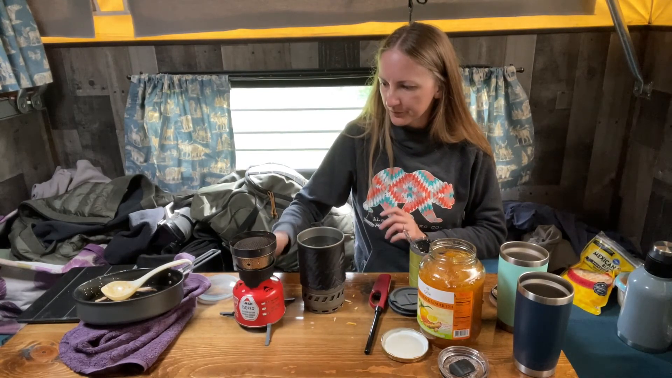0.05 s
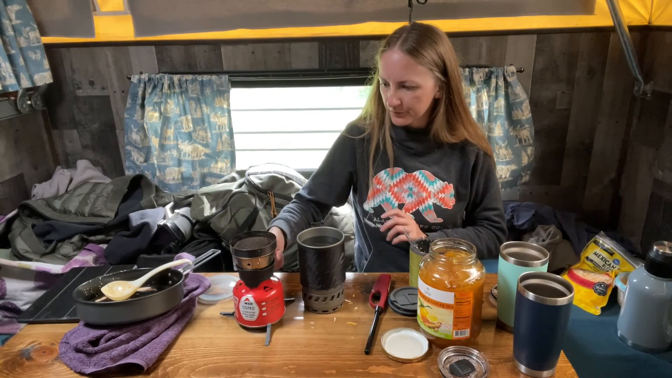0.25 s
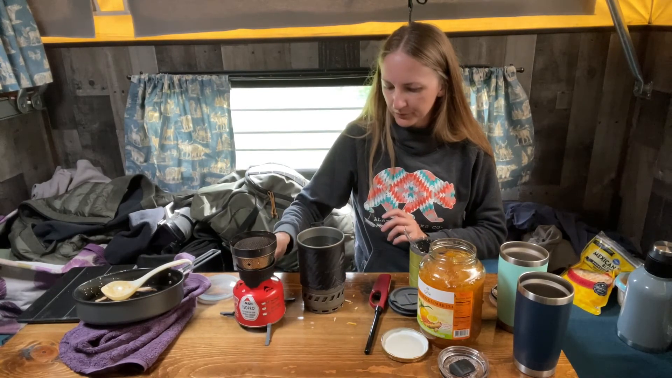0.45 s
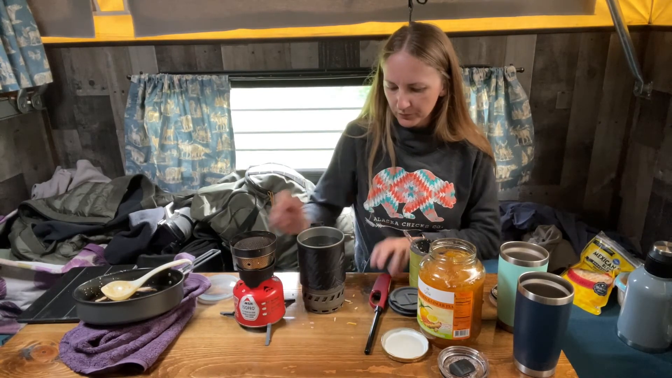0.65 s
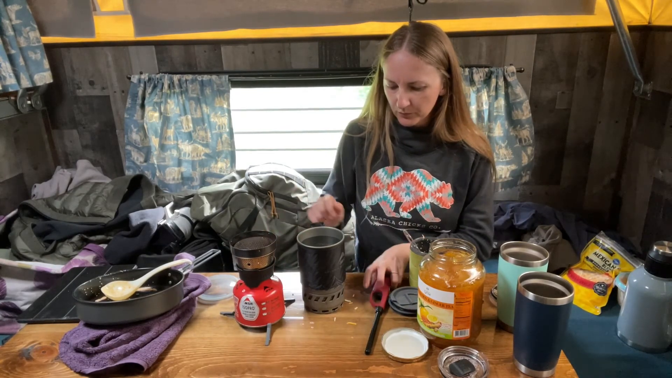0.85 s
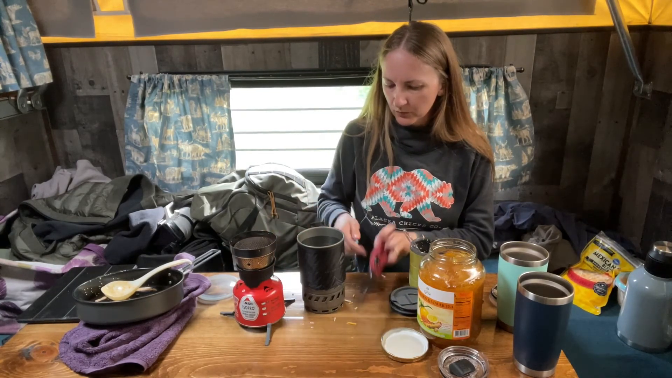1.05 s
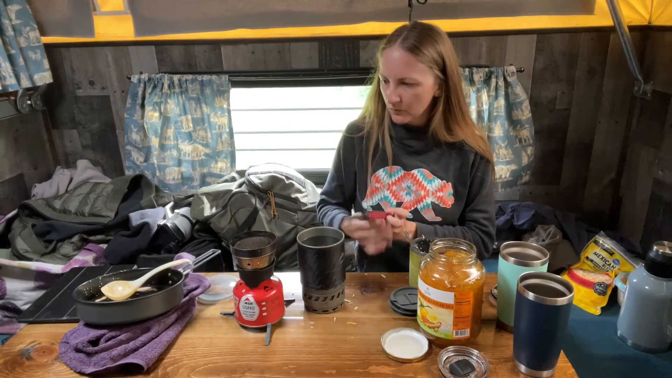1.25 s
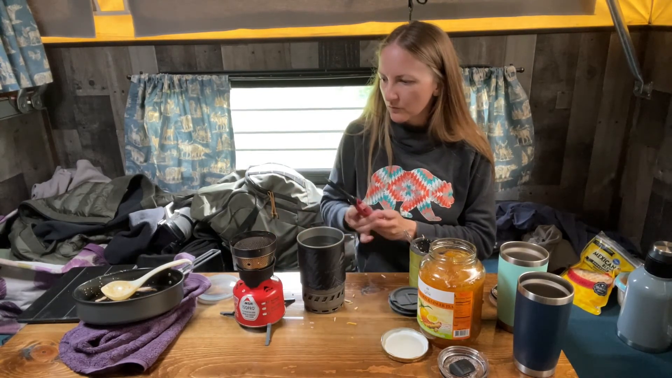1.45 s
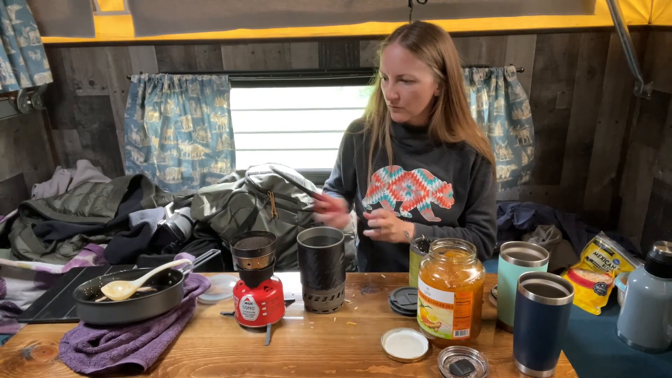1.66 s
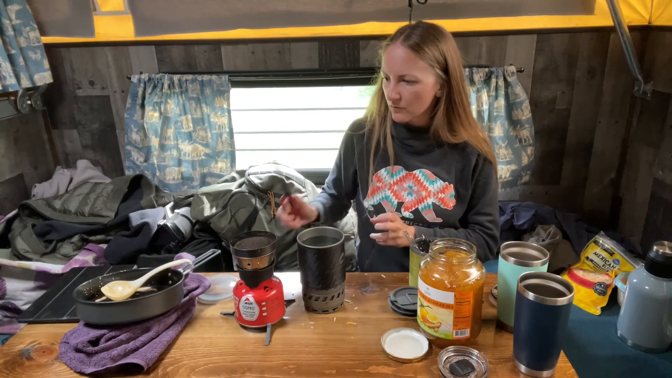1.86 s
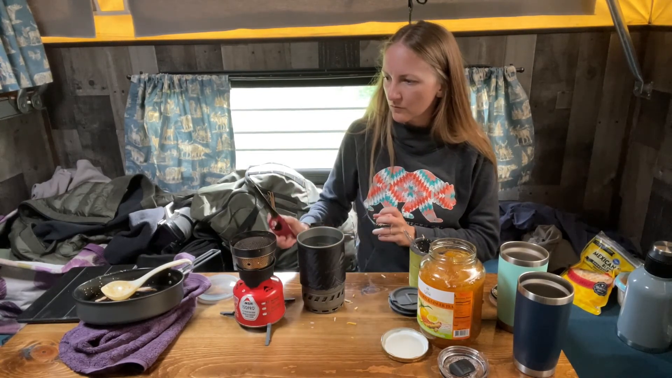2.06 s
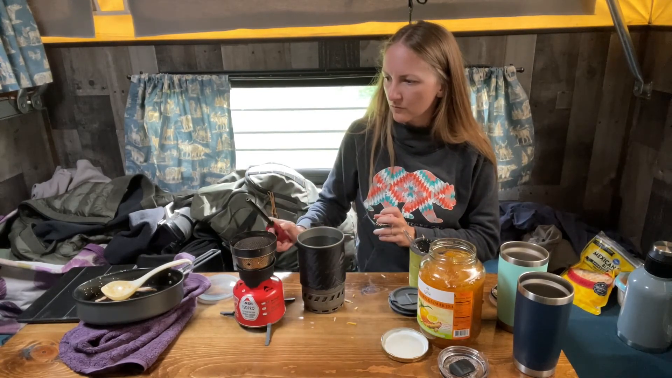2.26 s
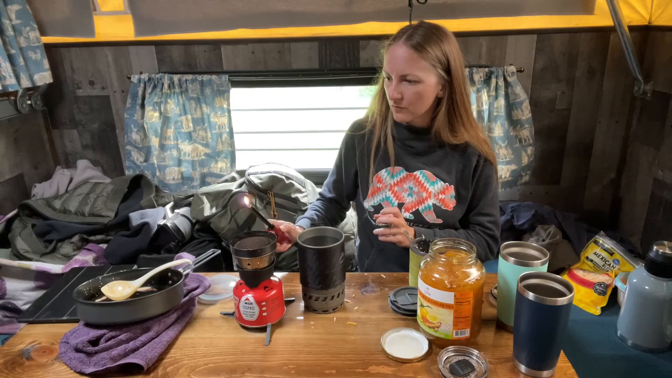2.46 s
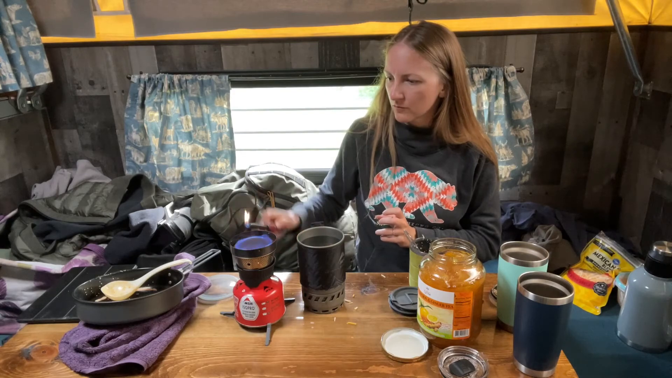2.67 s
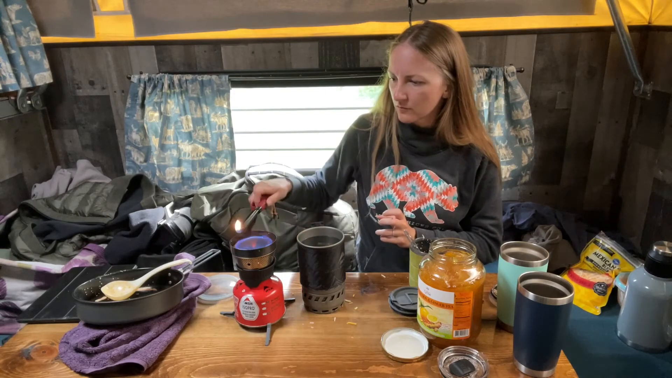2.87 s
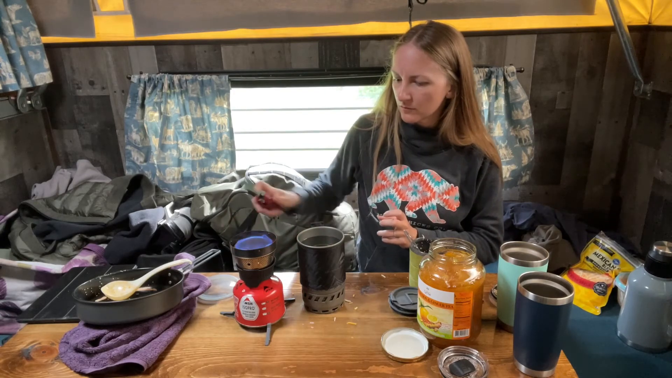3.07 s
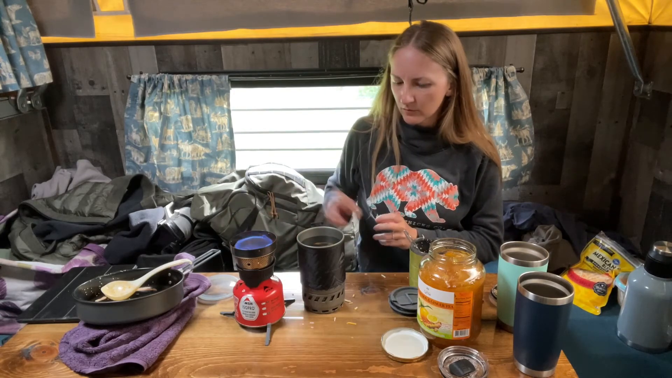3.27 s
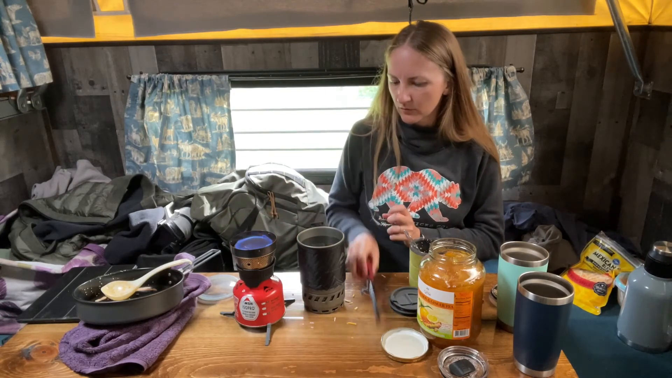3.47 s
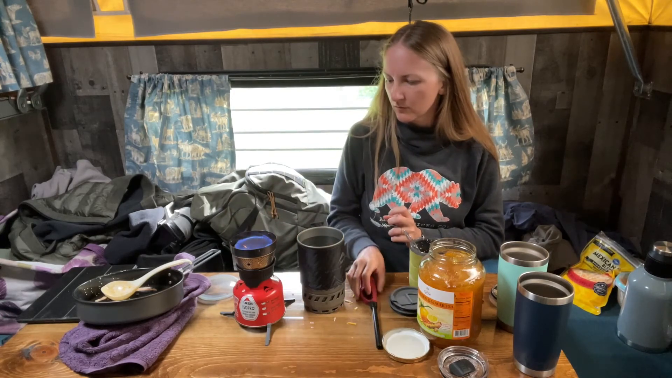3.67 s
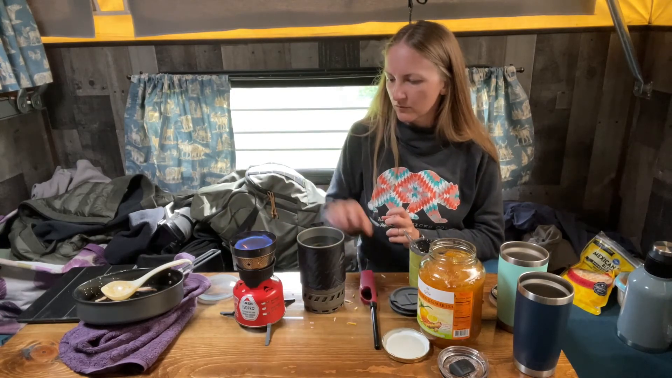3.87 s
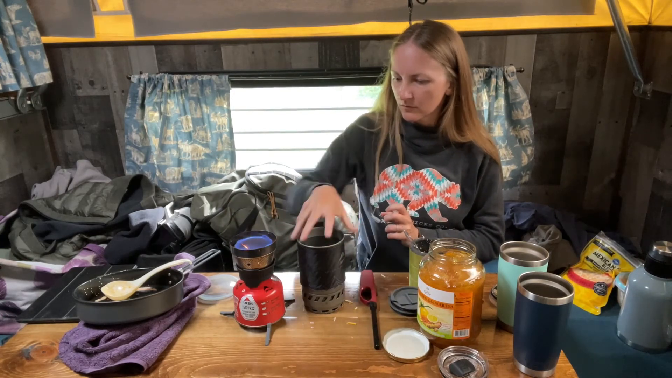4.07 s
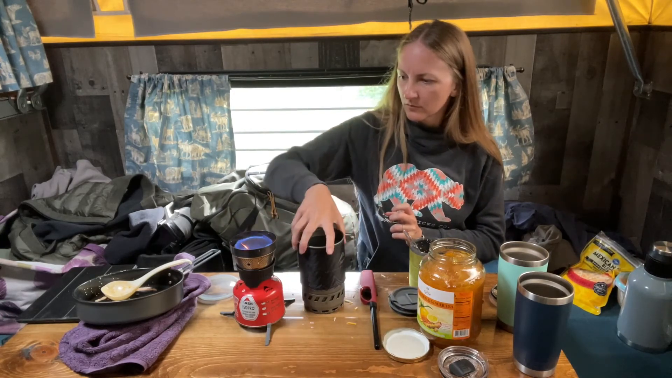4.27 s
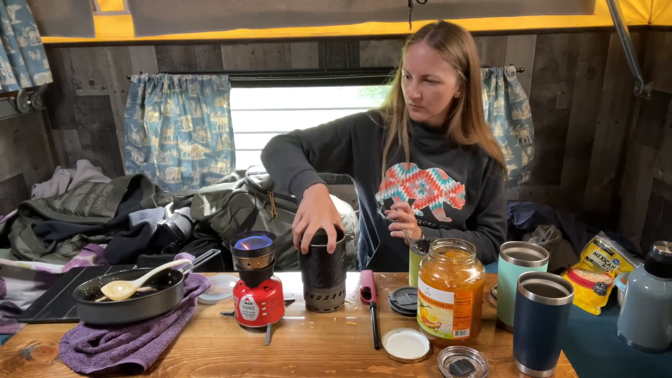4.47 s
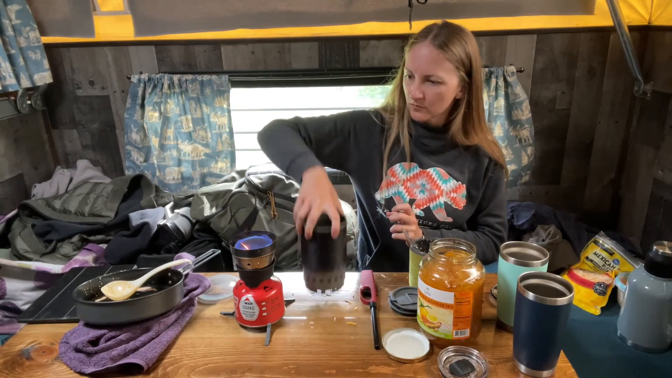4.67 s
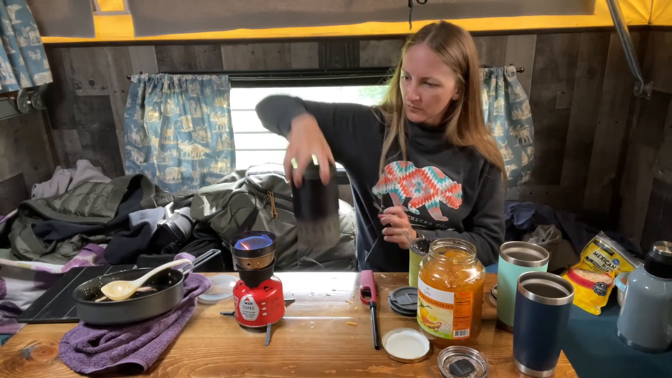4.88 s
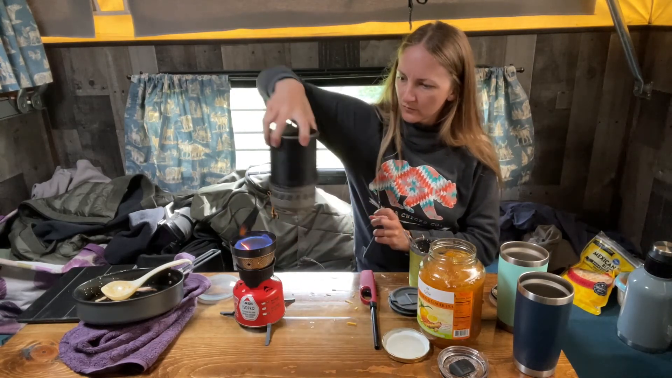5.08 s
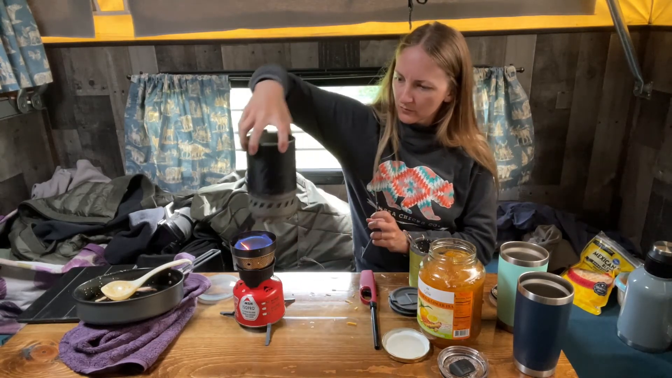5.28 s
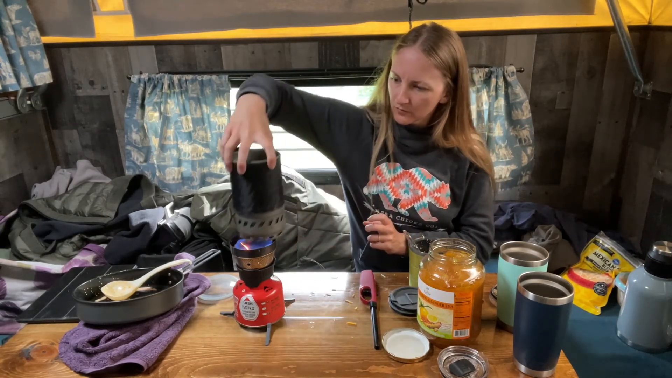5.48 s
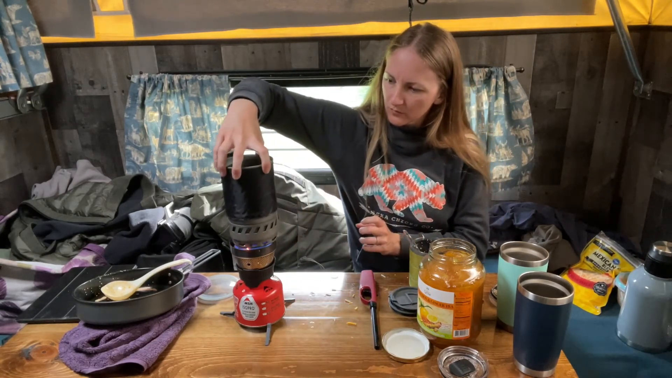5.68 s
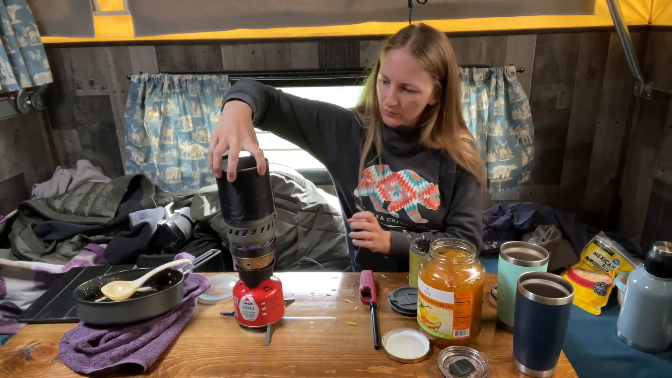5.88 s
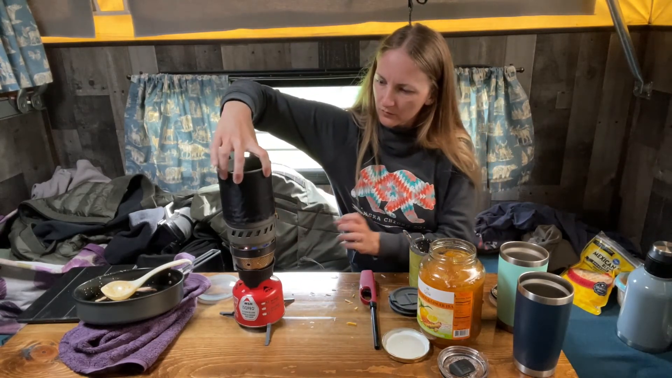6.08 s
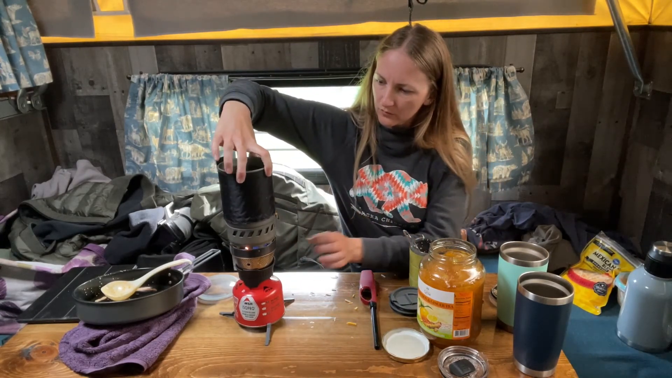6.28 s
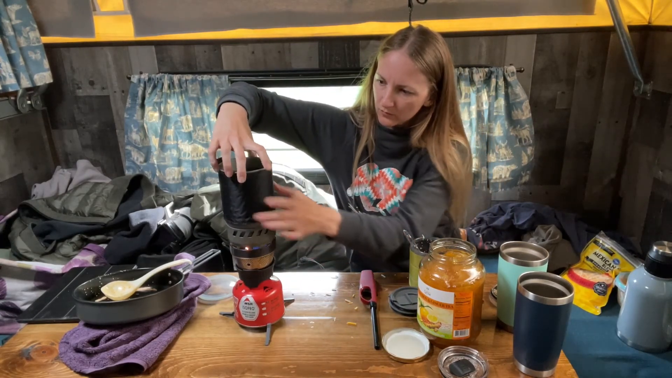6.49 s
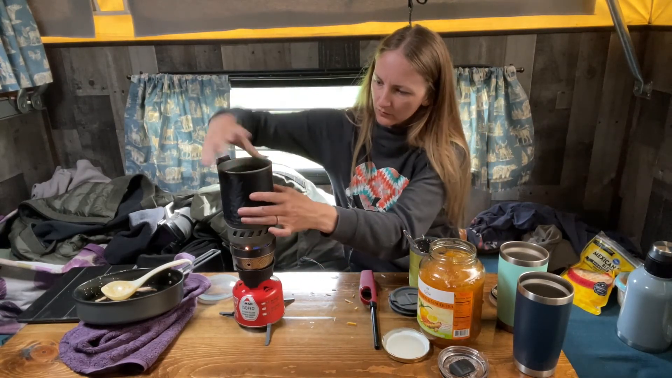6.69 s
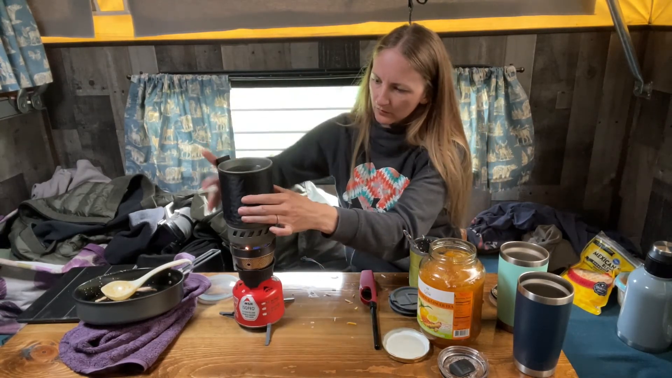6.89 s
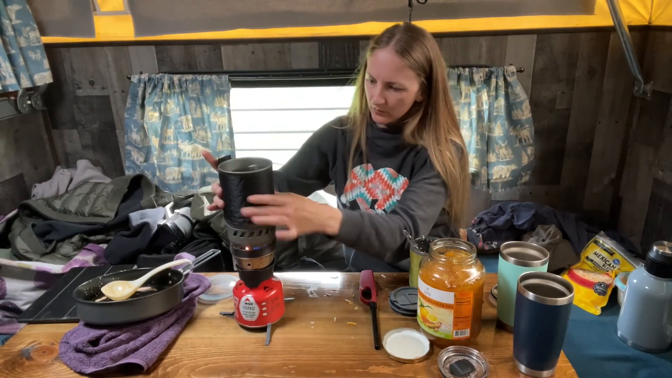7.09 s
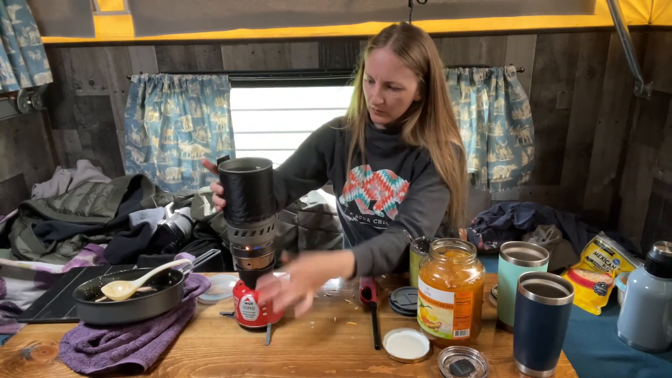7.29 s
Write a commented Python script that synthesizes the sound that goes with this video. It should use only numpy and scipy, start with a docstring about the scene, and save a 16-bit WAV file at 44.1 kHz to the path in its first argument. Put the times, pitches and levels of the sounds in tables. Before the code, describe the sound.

A faint gas hiss from a camp stove swells at about 0.2 seconds as the valve opens, then holds steady throughout, heard close in a small camper. Soft handling bumps come around 0.7 seconds. At 2.35 seconds a lighter snaps sharply, the loudest sound, and the gas catches with a low whump and puff. The hiss brightens a little over a faint flame rumble. The trigger clicks back at 2.8 seconds. At 3.4 seconds the lighter clatters onto a wooden table, its steel tube ringing briefly, with small bounces until 3.7. From 4 to 4.8 seconds a metal pot is gripped and lifted with light taps and faint swishes. It clanks twice onto the burner at about 5.5 seconds and scrapes into place with tiny ticks and dull bumps. The hiss shifts in tone and continues to the end, with one soft knock near 6.5 seconds.

```python
"""In a small camper, a canister camp stove stands on a wooden table. The valve opens and gas hisses from
the jet. A long piezo lighter snaps, the gas catches with a whump and the flame rumbles on. The lighter
drops on the table and its steel tube rings. Then a pot of water clanks onto the burner, changing the
colour of the hiss. Hiss, rumble and knocks are shaped noise; rings and thumps are fading pure tones."""
import sys
import numpy as np
from scipy import signal
from scipy.fft import rfft, irfft
from scipy.io import wavfile
from scipy.ndimage import uniform_filter1d, map_coordinates

SR = 44100
rng = np.random.default_rng(int(sys.argv[2]) if len(sys.argv) > 2 else 0)


def to_wav(sig):
    """Store sig (one row per channel, or 1-D mono) as 16-bit WAV at the path in sys.argv[1].

    Samples outside -1..1 are clipped; the rate is SR.
    """
    pcm = np.clip(np.atleast_2d(sig), -1, 1) * 32767
    pcm = np.round(pcm).astype(np.int16)
    wavfile.write(sys.argv[1], SR, pcm.T)  # frames by channels


N = 323694
TIME = np.arange(N) / SR

# Overall shape of each noise, from bass to treble: pitch_hz, level_db
COLD_HISS_SHAPE = [(150, -18.5), (550, -13), (1100, -14.5), (1700, -9.5), (2700, -9.5), (3500, -11),
                   (4400, -15.5), (5400, 1.5), (6700, -5.5), (9500, -6), (11500, -15.5), (13300, -14),
                   (14400, -10.5), (15500, -17)]
LIT_HISS_SHAPE = [(150, -9.5), (550, -8), (1100, -13), (1700, -7.5), (2700, -2), (3500, -5.5), (4400, -3.5),
                  (5400, 1.5), (6700, -2.0), (9500, -1.2), (11500, -11.5), (13300, -8), (14400, -6),
                  (15500, -9)]
COVERED_HISS_SHAPE = [(150, -2.5), (550, -11), (1100, -13), (1700, -4), (2700, -1), (3500, -12),
                      (4400, -5.5), (5400, -1.5), (6700, -15.0), (9500, -1), (11500, -14.5), (13300, -14.5),
                      (14400, -6), (15500, -23)]
FLAME_SHAPE = [(20, -17), (33, -14), (48, 3), (65, -0.5), (80, -5), (105, -4), (140, -27.5), (300, -23),
               (1000, -75)]
PUFF_SHAPE = [(60, 3), (270, 5), (500, -20), (1300, -21), (4000, -38)]
SNAP_SHAPE = [(150, -17.5), (700, -23), (1100, -15), (2800, 1.5), (4300, -6.5), (6500, -3), (10500, -3.5),
              (12000, -17), (14000, 1), (15700, -7)]
WOOD_SHAPE = [(100, -30), (250, -11.5), (450, -1.5), (620, -10.5), (1100, -3), (2300, -2.5), (3200, -4.5),
              (6000, -14), (10000, -17), (15500, -27)]
POT_SHAPE = [(150, -9), (500, -12.5), (1100, 3.5), (3000, -6), (5000, -6), (9000, -2), (12000, -18),
             (15500, -20)]
CAMPER_SHAPE = [(20, -10), (45, -2.5), (95, 3), (160, -6), (260, -7.5), (400, -11), (600, -12.5),
                (1500, -15), (6000, -44)]

# Resonances, the pitches that each object makes louder: pitch_hz, width_hz, boost_db
COLD_BURNER_PEAKS = [(642, 28, 8.2), (770, 74, 10.7), (934, 32, 14.8), (1280, 103, 15), (1500, 44, 13.5),
                     (1708, 150, 11.4), (1865, 64, 8.6), (2083, 63, 10.4), (2356, 113, 10),
                     (2830, 380, 5.8), (3620, 59, 4.8), (3960, 59, 9), (4180, 140, 13.8), (4510, 210, 13.3),
                     (5018, 115, 13.5), (5254, 62, 6.8), (5610, 61, 9.5), (5820, 61, 7.3), (6050, 38, 8.4),
                     (8280, 51, 6.8)]
LIT_BURNER_PEAKS = [(771, 106, 12.4), (935, 25, 16.3), (1232, 220, 12.7), (1303, 36, 11.2),
                    (1462, 91, 11.2), (1695, 107, 13.3), (1895, 102, 12.7), (2028, 46, 9.1),
                    (2400, 107, 11.1), (2644, 48, 7.5), (3950, 87, 6.8), (4197, 74, 10.5), (4640, 63, 13.6),
                    (4890, 96, 9.1), (5226, 210, 9.7), (5510, 100, 13.1), (5800, 110, 12), (6030, 52, 11),
                    (6330, 130, 6.3), (6870, 42, 7.6)]
COVERED_BURNER_PEAKS = [(770, 88, 9.9), (933, 64, 15.4), (1260, 36, 11), (1453, 100, 10.4),
                        (1576, 250, 12.9), (1930, 37, 5.3), (2415, 15, 15), (4190, 68, 6.2),
                        (4660, 67, 6.7), (4982, 227, 15.6), (5610, 61, 11.3), (5833, 215, 12.4),
                        (6016, 250, 8.3), (6410, 230, 11), (6700, 169, 9.7), (7070, 120, 16),
                        (7350, 52, 6.4), (7650, 64, 7.3), (7920, 200, 9.9), (8270, 190, 6.1)]
LIGHTER_PEAKS = [(1000, 180, 4.5), (1380, 470, 13.2), (2280, 220, 13), (3590, 110, 4), (5030, 490, 9.1),
                 (8600, 720, 11.3), (9630, 246, 7)]
TABLE_PEAKS = [(491, 44, 8.5), (820, 170, 10.7), (1590, 290, 10), (2030, 43, 4.2)]
POT_BODY_PEAKS = [(1620, 50, 10.2), (2140, 115, 8.9), (2430, 310, 9.5), (3110, 790, 10.2), (3860, 520, 7.8),
                  (4800, 300, 13), (5570, 530, 2.5), (12879, 139, 8.3)]

# Short bursts (more tilt is brighter): start_s, level_db, tilt_db_per_octave, boosted_pitch_hz
FLAME_PUFFS = [(2.497, -30.5, 1.5, 776), (2.523, -29, -10, 231)]  # the flame runs round the burner
TRIGGER_SNAPS = [(2.3513, -4, -0.5, 1460), (2.3558, -10, -0.5, 2700), (2.807, -23.5, -2.5, 2700)]  # the trigger is pressed and let go
LIGHTER_KNOCKS = [(.697, -43, -6, 300), (0.786, -36, 6, 1500), (1.607, -40.5, -2, 2600),
                  (3.431, -14, 5.5, 2200), (3.4396, -12.5, -0.5, 1690), (3.581, -34, 3.5, 1600),
                  (3.595, -18.5, -0.5, 1470), (3.655, -24.5, 3, 3300), (3.662, -28.5, -7.5, 950)]  # the lighter is picked up, handled and dropped
POT_CLANKS = [(4.016, -28.5, 6, 3300), (4.058, -31.5, 3.5, 8300), (4.1, -41, -5, 2200),
              (4.16, -38.5, -4, 1700), (4.615, -39.5, -3, 2500), (4.78, -39, -4, 1100),
              (5.4969, -19, 1, 1470), (5.5897, -21.5, -1.5, 2360), (5.604, -35, 4, 4100),
              (6.464, -33.5, -2.5, 450)]  # the pot is gripped, lifted and set on the burner

# Swells of pressure as the gas catches: start_s, pitch_hz, level_db, rise_s
WHUMPS = [(2.452, 42, -33.5, 0.024), (2.497, 75, -28.5, 0.0076), (2.531, 46.7, -22.5, 0.014)]
# The lighter's tube rings while it is clear of the wood: start_s, end_s, level_db, fade_s
# (here and below, a fade is the time a sound takes to drop by 60 dB)
LIGHTER_RINGS = [(3.432, 3.497, -18.5, 0.48), (3.509, 3.598, -34, 0.61)]
# Ringing tones of the pot's metal base, relative to the clank: pitch_hz, level_db
POT_TONES = [(1420, -13.5), (2090, -15), (2430, -8.5), (3020, -14), (3970, -12), (4830, -11)]
# Swishes as things are handled: middle_s, level_db, half_length_s
HAND_SWISHES = [(0.715, -49, 0.027), (4.122, -53, 0.07), (4.341, -52, 0.037), (4.789, -48, 0.025),
                (5.163, -53, .07), (5.769, -52.5, .11), (6.302, -51, 0.042), (6.808, -58, .04)]
# Hands bump the table: start_s, level_db
HAND_BUMPS = [(.712, -36), (.82, -44), (4.335, -40), (5.671, -38.5), (5.924, -38.5)]

CATCH_S, WARM_UP_S = 2.45, 0.12  # the burner warms once the gas has caught
HALF_COVERED_S, COVER_EASE_S, COVER_DB = 5.48, 0.15, -1.0  # the pot comes down over the burner


def gas_jet():
    """Swirling gas hisses through the burner; heat and then the pot shift its resonances."""
    heat = ramp(CATCH_S, WARM_UP_S)
    covered = .5 + .5 * np.tanh(.5 * (TIME - HALF_COVERED_S) / COVER_EASE_S)
    valve_open = ramp(start_s=.16, length_s=.15)
    trickle_db, full_flow_db = -46.5, -37.5
    flow_db = trickle_db + (full_flow_db - trickle_db) * valve_open + COVER_DB * covered
    cold_hiss = np.sqrt(1 - heat) * noise(COLD_HISS_SHAPE, COLD_BURNER_PEAKS)
    lit_hiss = np.sqrt(heat) * noise(LIT_HISS_SHAPE, LIT_BURNER_PEAKS)
    covered_hiss = np.sqrt(covered) * noise(COVERED_HISS_SHAPE, COVERED_BURNER_PEAKS)
    hiss = np.sqrt(1 - covered) * (cold_hiss + lit_hiss) + covered_hiss
    heard = with_echoes(hiss, echo_db=-15, spread_s=.014, above_hz=3700, sway_s=.00004)
    return from_db(flow_db) * steady(heard, over_s=0.2)  # the valve holds the flow steady


def flame():
    """The gas catches with a whump and a soft puff, flares, then settles to a steady rumble."""
    light_s, settle_s, settled_db = 2.34, 0.19, -50
    flare_db = 4 * np.exp(-np.maximum(TIME - light_s, 0) / settle_s)
    strength = ramp(light_s, length_s=.04) * from_db(settled_db + flare_db)
    rumble = strength * steady(noise(FLAME_SHAPE), over_s=.2)
    puff = knocks(FLAME_PUFFS, PUFF_SHAPE, [],
                  attack_s=0.0016, fade_s=0.081, boost_db=15.5, tail_db=-22, tail_fade_s=.2)
    return rumble + puff + thumps(WHUMPS)


def lighter():
    """The piezo trigger snaps; later the lighter clatters on the wood and its steel tube rings."""
    out = knocks(TRIGGER_SNAPS, SNAP_SHAPE, LIGHTER_PEAKS,
                 attack_s=0.00056, fade_s=0.046, boost_db=5, tail_db=-12.5, tail_fade_s=0.14)
    out += knocks(LIGHTER_KNOCKS, WOOD_SHAPE, TABLE_PEAKS,
                  attack_s=0.001, fade_s=0.097, boost_db=5, tail_db=-18.5, tail_fade_s=0.32)
    t, touch_s, tube_hz = TIME[:SR], .005, 3796
    for start_s, end_s, level_db, fade_s in LIGHTER_RINGS:
        off_wood = np.clip(t / touch_s, 0, 1) * np.clip((end_s - start_s - t) / touch_s + .5, 0, 1)
        ring = from_db(level_db - 60 * t / fade_s) * np.sin(2 * np.pi * tube_hz * t)
        add(out, start_s, off_wood * ring)
    return out


def pot():
    """The pot clanks, scrapes and rings; its sleeve and the water quickly hush it."""
    out = knocks(POT_CLANKS + rim_slips(), POT_SHAPE, POT_BODY_PEAKS,
                 attack_s=0.001, fade_s=0.089, boost_db=9, tail_db=-27, tail_fade_s=0.15)
    t, fade_s = TIME[:SR // 2], 0.1
    ring = sum(from_db(db - 60 * t / fade_s) * np.sin(2 * np.pi * hz * t) for hz, db in POT_TONES)
    for start_s, level_db, *_ in POT_CLANKS:
        add(out, start_s, from_db(level_db) * ring)
    return out


def rim_slips(start_s=5.66, length_s=.21, count=10, level_db=-41.5, tilt_db=-3, pitch_hz=3680):
    """List the tiny, uneven knocks of the rim catching as the pot is twisted into place."""
    step_s = length_s / (count - 1)
    return [(start_s + step_s * (k + .5 * late), level_db + extra_db, tilt_db, pitch_hz)
            for k, (late, extra_db) in enumerate(rng.standard_normal((count, 2)))]


def table_top(pitch_hz=95.2, rise_s=0.012, delay_s=0.0129):
    """The table sways with one low note under lighter, pot and hands; dull knocks sway it more."""
    sways = [(start_s + delay_s, level_db - 18 - 1.9 * tilt_db)
             for start_s, level_db, tilt_db, _ in LIGHTER_KNOCKS + POT_CLANKS]
    return thumps([(start_s, pitch_hz, level_db, rise_s) for start_s, level_db in sways + HAND_BUMPS])


def hands(pitch_hz=344):
    """Hands make soft, hollow swishes as they move things."""
    out = np.zeros(N)
    for middle_s, level_db, half_length_s in HAND_SWISHES:
        hollow = noise([(60, -6), (300, 2), (900, -4), (4000, -35)], [(pitch_hz, 110, 14)], size=SR)
        swell = np.exp(-((TIME[:SR] - .5) / half_length_s) ** 2)
        add(out, middle_s - .5, from_db(level_db) * swell * hollow)
    return out


def camper():
    """A faint, low background noise fills the camper."""
    return from_db(-60.5) * noise(CAMPER_SHAPE)


def with_echoes(sound, echo_db, spread_s, above_hz, sway_s, count=8):
    """Quick echoes ripple the treble; their delays wander, as when arms and pot move nearby."""
    sway = sway_s * drift(rate_hz=0.48)
    treble = signal.sosfilt(signal.butter(2, above_hz, "high", fs=SR, output="sos"), sound)
    echoes = 0
    for k, (distance, movement) in enumerate(rng.random((count, 2))):
        delay_s = spread_s * (.1 + distance) + (2 * movement - 1) * sway
        echoes += (-1) ** k * map_coordinates(treble, [(TIME - delay_s) * SR], order=3, mode="wrap")
    return unit_power(sound + from_db(echo_db) * echoes)


def knocks(rows, shape, peaks, attack_s, fade_s, boost_db, tail_db, tail_fade_s, size=16384):
    """Each knock is a burst of noise in the object's resonances, then the camper's short echo."""
    out, t = np.zeros(N), TIME[:size]
    direct = from_db(-60 * t / fade_s)
    room_tail = from_db(tail_db - 60 * t / tail_fade_s)
    loudness = np.minimum(t / attack_s, 1) * np.hypot(direct, room_tail)
    for start_s, level_db, tilt_db, pitch_hz in rows:
        struck_spot = (pitch_hz, 0.18 * pitch_hz, boost_db)  # the spot hit brings out one resonance
        body = noise(shape, [*peaks, struck_spot], tilt_db, size)
        add(out, start_s, from_db(level_db) * loudness * steady(body, over_s=0.0052))
    return out


def thumps(rows):
    """Low swings of the air build up and die within a few cycles."""
    out, t = np.zeros(N), TIME[:SR // 2]
    for start_s, pitch_hz, level_db, rise_s in rows:
        swell = t / rise_s * np.exp(1 - t / rise_s)
        add(out, start_s, from_db(level_db) * swell * np.sin(2 * np.pi * pitch_hz * t))
    return out


def noise(shape, peaks=(), tilt_db=0, size=N):
    """Make noise of power 1 with an overall shape, resonances and a tilt per octave."""
    hz = np.maximum(np.fft.rfftfreq(size, 1 / SR), 1)
    shape_hz, shape_db = np.transpose(shape)
    level_db = np.interp(np.log(hz), np.log(shape_hz), shape_db)
    level_db += tilt_db * np.log2(np.maximum(hz, shape_hz[0]))
    for pitch_hz, width_hz, boost_db in peaks:
        level_db += boost_db / (1 + (2 * (hz - pitch_hz) / width_hz) ** 2)
    phases = np.exp(2j * np.pi * rng.random(len(hz)))
    return unit_power(irfft(from_db(level_db) * phases, size))


def drift(rate_hz):
    """Wander slowly and randomly, by about 1 either way."""
    hz = np.fft.rfftfreq(N, 1 / SR)
    return unit_power(irfft(rfft(rng.standard_normal(N)) / (1 + (hz / rate_hz) ** 2), N))


def steady(sound, over_s):
    """Even out slow changes in loudness and keep the fast flutter."""
    return sound / np.sqrt(uniform_filter1d(sound ** 2, int(over_s * SR) + 1) + 1e-12)


def ramp(start_s, length_s):
    """Rise steadily from 0 to 1 and stay there."""
    return np.clip((TIME - start_s) / length_s, 0, 1)


def add(out, start_s, sound):
    """Mix in a short sound at its start time."""
    start = int(start_s * SR)
    out[start:start + len(sound)] += sound[:N - start]


def from_db(db):
    """Turn decibels into a volume multiplier."""
    return 10 ** (np.asarray(db) / 20)


def unit_power(sound):
    """Scale a sound so its average power is 1."""
    return sound / np.sqrt(np.mean(sound ** 2) + 1e-20)


def scene():
    """Everything is heard from one point, alike in both ears."""
    mono = gas_jet() + flame() + lighter() + pot() + table_top() + hands() + camper()
    return np.array([mono, mono])


def record(dry, cutoff_hz=15750):
    """The loudest snap overloads, and the highest treble is cut steeply."""
    treble_cut = signal.ellip(12, .1, 70, cutoff_hz, fs=SR, output="sos")
    return signal.sosfilt(treble_cut, np.clip(dry, -1, 1))


dry = scene()
out = record(dry)
to_wav(out)
```